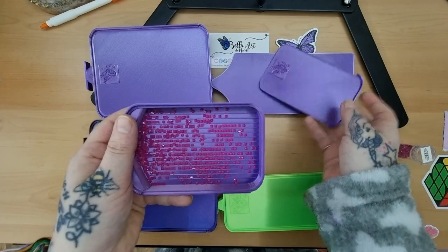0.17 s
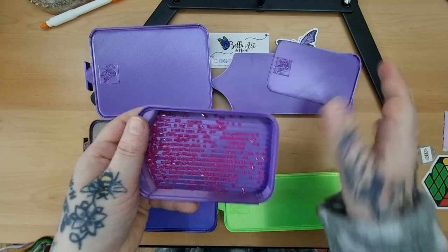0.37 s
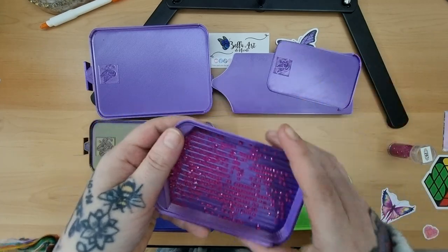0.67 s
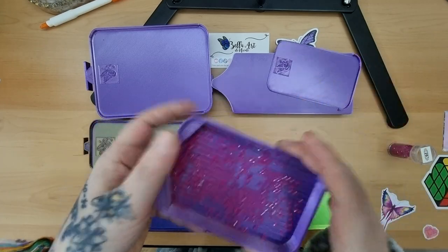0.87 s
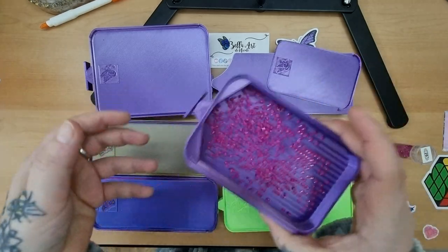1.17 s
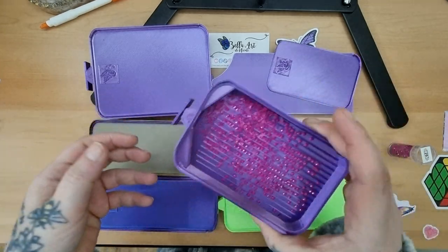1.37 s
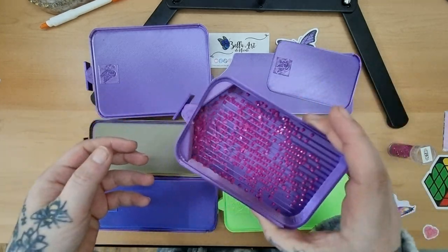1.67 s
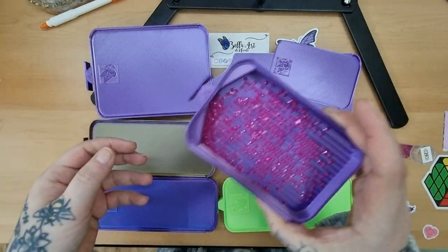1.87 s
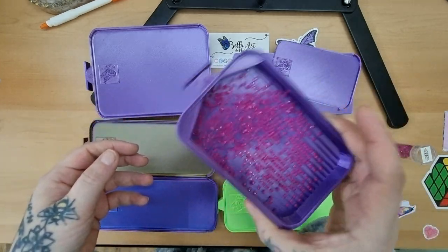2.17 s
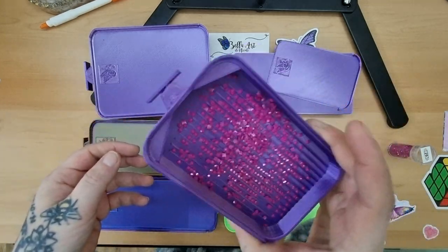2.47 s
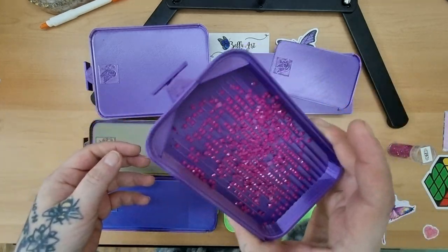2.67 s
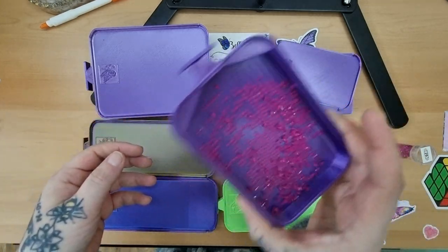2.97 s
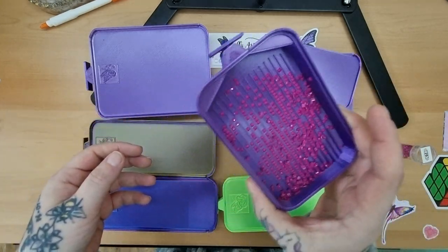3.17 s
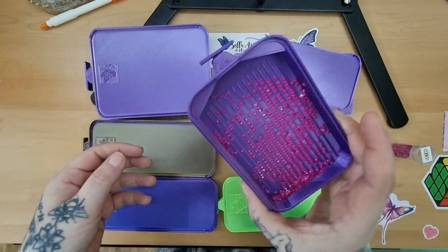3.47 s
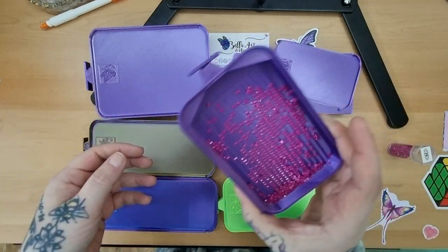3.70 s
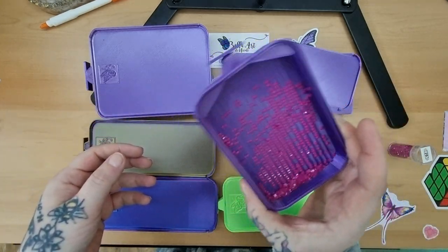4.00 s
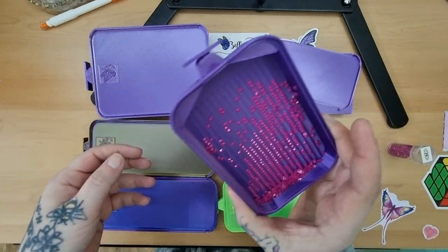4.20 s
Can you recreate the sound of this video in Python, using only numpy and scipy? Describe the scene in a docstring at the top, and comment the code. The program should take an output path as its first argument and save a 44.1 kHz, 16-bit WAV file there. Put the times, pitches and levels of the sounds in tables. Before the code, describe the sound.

Close up in a small quiet room, a plastic lid lands on a desk with several sharp clacks, followed by a hollow knock on a plastic tray. Lots of tiny gems then swish back and forth in the shaken tray, bright and rattly over a faint dull hum. Toward the end they settle into a softer, rapid trickling rattle that gradually weakens.

```python
"""A small quiet room, just above a wooden desk. A plastic lid clatters down and a hand knocks a ridged
plastic tray; each impact excites damped modes. The tray is shaken: hundreds of tiny resin gems slide in
surges with a dull hum, then in a fine, quick rattle, colliding and driving the resonant floor.
Sliding friction adds light scrapes and brief rubs, over faint room air."""
import sys
import numpy as np
from scipy import signal
from scipy.fft import rfft, irfft, next_fast_len
from scipy.io import wavfile
from scipy.ndimage import uniform_filter1d, map_coordinates

SR = 44100
rng = np.random.default_rng(int(sys.argv[2]) if len(sys.argv) > 2 else 0)


def unload_audio(sound):
    """Save the sound as a 16-bit wav file, at the path given as the first command line argument."""
    columns = np.transpose(np.atleast_2d(sound))
    # keep every value between -1 and 1, then stretch to whole-number steps
    steps = np.round(np.clip(columns, -1, 1) * 32767)
    wavfile.write(sys.argv[1], SR, steps.astype(np.int16))


N = 191495

# each swing of the tray sets the gems sliding: crest_s, level_db, rise_s
GEM_SURGES = [(1.036, -47.2, 0.032), (1.133, -36.0, 0.035), (1.203, -37.0, 0.026), (1.308, -36.7, 0.038),
              (1.47, -36.6, 0.041), (1.599, -35.9, 0.032), (1.679, -37.4, 0.024), (1.759, -39.9, 0.033),
              (1.983, -44.7, 0.024), (2.083, -40.9, 0.045), (2.179, -35.6, 0.035), (2.254, -41.9, 0.039),
              (2.344, -38.1, 0.016), (2.554, -42.0, 0.042), (2.693, -40.0, 0.05), (2.825, -43.6, 0.06),
              (2.982, -38.7, 0.028), (3.065, -44.2, 0.056), (3.144, -42.5, 0.047)]
# a fine shake rattles the gems; the last point is a quick fade-out at the end: time_s, relative_db
FINE_SHAKE = [(3.24, -52), (3.454, -47), (3.64, -52), (3.72, -48), (3.94, -52), (4.324, -55), (4.34, -65)]
# spectrum of the gems' ticks: frequency_hz, gain_db
TICK_SPECTRUM = [(80, -38), (220, -34), (340, -21), (680, -19), (900, -11.5), (1400, -13.5), (2080, -11),
                 (2600, -10.5), (3400, -6.5), (6500, -3), (7600, 0), (10200, -8), (12500, -6),
                 (14600, -10.5), (15700, -10)]
# their stereo width: frequency_hz, side_to_mid_db
TICK_WIDTH = [(300, 2), (900, -8.5), (1300, -2), (2000, -12.5), (2500, 3), (3400, -0.5), (4400, -1),
              (15000, 1)]
# the tilted tray throws its finest ticks to the right: frequency_hz, left_to_right_db
GEM_BALANCE = [(500, 2.5), (1000, 6), (2000, 2.5), (5000, -3), (8500, 1.4), (12500, 0), (16000, -12)]
# resonances of the tray floor: pitch_hz, width_hz, mid_db, side_db
FLOOR_RESONANCES = [(845, 53, -8, -26), (1621, 167, 4.5, 1), (1700, 92, 0.5, -14), (1844, 39, 2, -36),
                    (2170, 130, -17, 4), (2943, 214, -14.5, 2.5), (5520, 270, -11.5, -8),
                    (7450, 590, -18.5, -9)]
# the lid meets the desk: start_s, body_db, snap_db, thud_db, thud_hz, contact_s
LID_HITS = [(0.103, -36.5, -45.5, -49, 88.7, 0.0037), (0.11, -28, -47, -42.5, 91.7, 0.0042),
            (0.123, -23.5, -48, -37, 86.1, 0.011), (0.1595, -29.5, -26.5, -64, 87.5, 0.00017),
            (0.211, -36, -34.5, -69, 109, 0.00029), (0.236, -46.5, -47.5, -58, 82, 0.00089),
            (0.3425, -44.5, -40.5, -60, 227, 0.0005), (0.361, -34.5, -42, -62, 230, 0.0044),
            (0.388, -30.5, -40.5, -82, 110, 0.0063), (0.4062, -27.5, -28, -55.5, 99, 0.0013),
            (0.421, -43.5, -54, -45, 160.7, 0.00075)]
# the hand knocks the tray: start_s, body_db, snap_db, thud_db, thud_hz, contact_s
TRAY_HITS = [(0.673, -70, -63, -79, 110, 0.0011), (0.7235, -43, -40, -67, 89, 0.00095),
             (0.7285, -29, -37, -48, 85.2, 0.0049), (0.745, -36, -42, -48.5, 88, 0.0044),
             (0.85, -54.5, -50.5, -67, 88, 0.0039), (2.251, -35.5, -50, -58, 88.3, 0.004),
             (2.536, -42, -58, -56.5, 178.4, 0.0023), (2.948, -57, -67, -72, 91, 0.0079)]
# modes of the lid: pitch_hz, relative_db, t60_s, interaural_phase_rad
LID_MODES = [(263, -10.5, 0.14, 0.5), (345.4, -9, 0.21, 0.73), (484, 0.5, 0.086, 2.06),
             (794, 3.5, 0.04, 0.88), (839, -5, 0.085, 1.1), (1070, 10, 0.019, 1.8),
             (1222, 11.5, 0.027, 1.45), (1366, 4.5, 0.057, 0.73), (1610, 0, 0.087, 3.4),
             (1910, -2, 0.026, 1.1), (3000, -7, 0.061, 2), (3870, 3, 0.028, 1.3)]
# modes of the tray: pitch_hz, relative_db, t60_s, interaural_phase_rad
TRAY_MODES = [(279, -9.5, 0.095, 0.6), (331, -7, 0.38, 0.96), (550, -7, 0.07, 1.7), (746.7, -2, 0.23, 2),
              (827, 9.5, 0.076, 3), (1022, -5, 0.18, 5), (1342, 11.5, 0.072, 2.1), (1580, -7, 0.19, 9.3),
              (1890, 6.5, 0.022, 0.65), (2153, 2.5, 0.097, 3.15), (2905, 13, 0.02, 0.73),
              (3190, -2.5, 0.18, 0.85)]
# modes of the thud: pitch_ratio, relative_db, t60_s, interaural_phase_rad
THUD_MODES = [(1, 1, 0.17, 0.28), (2.07, -3, 0.19, 0.87)]
# dense clack of a plastic body: frequency_hz, gain_db
CLACK_SPECTRUM = [(60, -60), (160, -33), (280, 14), (400, -6.5), (620, -3.5), (820, -0.5), (1300, -8),
                  (2200, -4.5), (3300, -3), (4200, -23), (9000, -35), (16000, -62)]
# bright snap of contact: frequency_hz, gain_db
SNAP_SPECTRUM = [(500, -37), (2500, -29), (4200, 5), (6000, 1.5), (8000, -1.5), (10000, -8), (16000, -15)]
# plastic slides: start_s, length_s, level_db
SCRAPES = [(0, 0.49, -56.5), (.5, 0.029, -65), (.617, 0.036, -64), (.8, 0.046, -52.5)]
# its light scrape: frequency_hz, gain_db
SCRAPE_SPECTRUM = [(200, -3), (350, -4), (700, -0.5), (1200, -9.5), (1700, 1.5), (2200, -3.5), (3400, -7),
                   (4400, -14.5), (5200, -9), (6200, -18.5), (7800, -17), (9500, -40), (16000, -24)]
# the lid drags on the desk: start_s, length_s, level_db
DRAGS = [(.215, 0.045, -45), (.34, 0.067, -42)]
# its hollow judder: frequency_hz, gain_db
DRAG_SPECTRUM = [(120, -52), (250, 6), (350, -20), (450, 6.5), (540, 1), (660, 2), (850, -33), (1300, -7),
                 (3000, -22), (9000, -61)]
# dull low sounds of the tray: brief finger rubs, and a steady hum from the shaken gems (the long row):
# start_s, length_s, level_db
TRAY_LOWS = [(0, 0.022, -60), (.5, 0.22, -72.5), (1.0, 1.9, -76), (2.945, 0.055, -65.5), (3.85, 0.45, -70)]
# spectrum of these low sounds: frequency_hz, gain_db
TRAY_LOW_SPECTRUM = [(60, -9.5), (180, -23), (270, -0.5), (345, 8.5), (450, -1.5), (650, -5), (1200, -61),
                     (4000, -71)]
# stereo width of desk sounds and air: frequency_hz, side_to_mid_db
NOISE_WIDTH = [(80, -5), (200, -23), (330, -2), (600, 1.5), (1050, 0), (1550, 6), (2300, 2), (5000, 1)]
# reverberation time of the room: frequency_hz, t60_s
ROOM_DECAY = [(80, 0.25), (250, 0.44), (1500, 0.15), (5000, 0.18), (14000, 0.15)]
# room air: frequency_hz, gain_db
AIR_SPECTRUM = [(20, -23), (80, -1.5), (160, -16.5), (350, -9), (1000, 0), (4000, -1.5), (10000, -11.5),
                (16000, -31)]

IMPACTS_PER_S, BRISK_DB = 15000, -43  # collision rate and level of a brisk swing
COAST_T60_S = 0.67  # the gems coast to rest after each crest
ROCK_HZ, ROCK_DB = 8.9, 0.27  # the wrist rocks the tray
FIRST_FLICK_S, FLICK_HZ, FLICK_DB = 3.319, 27.16, 0.5  # level relative to the steady trickle
BUNCH_S = 0.0077  # half the time a bunch of gems takes to land
UNEVEN_DB, UNEVEN_S = 1.4, 0.0018  # flicks scatter in strength and timing
ATTACK_S, RELEASE_T60_S = 0.004, 0.26  # of scrapes, drags, rubs and hum
TOP_HZ = 15760


def gems():
    """Collision noise: harder shaking brings more and louder impacts, gem on gem and gem on floor."""
    strength = np.hypot(surging(), fine_shaking())
    rate = np.clip(IMPACTS_PER_S * (strength / amp(BRISK_DB)) ** .6, 200, SR)
    impacts = collisions(rate, spread_db=5) * amp(0.42 * wobble(140))  # neighbours set each other off
    ticks = filtered(wandering(impacts, depth_db=4.0), lambda hz: amp(along(TICK_SPECTRUM, hz)))
    ticks = stereo(ticks, TICK_WIDTH)
    # only the gems that land drive the floor, so its ring chatters
    mid, side = filtered(impacts * amp(1.5 * wobble(50)), tray_floor)
    drum = unit(np.array([mid + side, mid - side]))
    rattle = strength * (amp(-0.25) * ticks + amp(-13.0) * drum)
    return filtered(rattle, lambda hz: amp(np.outer([.5, -.5], along(GEM_BALANCE, hz))))


def surging():
    """Incoherent sources add in power: the envelope of surges that swell to a crest, then coast."""
    t = np.arange(N) / SR
    power = np.zeros(N)
    for crest, db, rise in GEM_SURGES:
        swell = np.exp(-(np.minimum(t - crest, 0) / rise) ** 2)
        power += swell * amp(db - 60 * np.maximum(t - crest, 0) / COAST_T60_S) ** 2
    return np.sqrt(power)


def fine_shaking():
    """Amplitude modulation: the envelope of a rocking trickle, with a bunch of gems on every flick."""
    t = np.arange(N) / SR
    flicks = np.arange(FIRST_FLICK_S, N / SR, 1 / FLICK_HZ)
    bunches = np.zeros(N)
    for s, (size, late) in zip(flicks, rng.standard_normal((100, 2))):
        landing = np.exp(-((t - s - UNEVEN_S * late) / BUNCH_S) ** 2)
        bunches += amp(FLICK_DB + UNEVEN_DB * size) ** 2 * landing
    trickle_db = np.interp(t, *np.transpose(FINE_SHAKE), left=-np.inf) + 1.5
    rock_db = ROCK_DB * np.cos(2 * np.pi * ROCK_HZ * (t - FIRST_FLICK_S))
    return amp(trickle_db + rock_db) * np.sqrt(1 + bunches)


def collisions(rate, spread_db):
    """Shot noise: independent impulses, rate a second, of random size and place (mid, side)."""
    happens = rng.random(N) < rate / SR
    size = amp(spread_db * np.clip(rng.standard_normal(N), -2, 2))
    place = 2 * np.pi * rng.random(N)
    return unit(happens * size / np.sqrt(rate) * np.array([np.cos(place), np.sin(place)]))


def wandering(x, depth_db):
    """Modal excitation depends on position: as the gems cross the floor, peaks and hollows drift."""
    hz, _, spectrum = signal.stft(x, SR, nperseg=1024)
    field = uniform_filter1d(rng.standard_normal(spectrum.shape), size=6, axis=1)
    field = unit(uniform_filter1d(field, size=14, axis=2))
    # dense high modes even out
    reach = along([(600, 0.45), (2400, 0.84), (6000, 0.42), (12000, 0.18)], hz)[:, None]
    return signal.istft(spectrum * amp(depth_db * reach * field), SR, nperseg=1024)[1][:, :N]


def tray_floor(hz):
    """Resonance: the thin, ridged floor responds (mid, side) in peaks with steep skirts."""
    return sum(amp([[mid], [side]]) / (1 + ((hz - pitch) / width) ** 2) ** 2
               for pitch, width, mid, side in FLOOR_RESONANCES)


def knocks(hits, modes, body_t60, snap_t60, ring_db):
    """Impact excitation: each blow leaves a decaying clack, ringing modes, a snap and a dull thud."""
    out, t = np.zeros((2, N)), np.arange(SR // 2) / SR
    for start, body_db, snap_db, thud_db, thud_hz, contact in hits:
        clack = noise(CLACK_SPECTRUM, len(t)) * amp(-60 * t / body_t60)
        body = clack + amp(ring_db) * ring(modes, t)
        scuff_t60 = snap_t60 + 12 * contact  # soft contacts scuff for longer
        snap = noise(SNAP_SPECTRUM, len(t)) * amp(-60 * t / scuff_t60)
        thud = ring(np.multiply(THUD_MODES, [thud_hz, 1, 1, 1]), t)
        rise = 1 - np.exp(-t / contact)
        add(out, start, rise * (amp(body_db) * body + amp(snap_db) * snap + amp(thud_db) * thud))
    return out


def ring(modes, t):
    """Free vibration: a sum of damped sinusoids of random strength, offset in phase between the ears."""
    hz, db, t60, apart = np.transpose(modes)[:, :, None]
    size, phase = rng.standard_normal((2, len(modes), 1))
    gain = amp(db + 2.7 * size)
    waves = [np.sin(2 * np.pi * hz * t + np.pi * phase + ear * apart) for ear in (.5, -.5)]
    return np.sum(gain * amp(-60 * t / t60) * waves, axis=1) / np.sqrt(np.sum(gain ** 2) / 2)


def contact_noise(spans, spectrum, rough_db, rough_hz):
    """Random excitation, by friction or shaken gems: rough noise that sets in, lasts, then dies away."""
    t = np.arange(N) / SR
    envelope = np.zeros(N)
    for start, length, db in spans:
        attack = np.clip((t - start) / ATTACK_S, 0, 1)
        envelope += attack * amp(db - 60 * np.maximum(t - start - length, 0) / RELEASE_T60_S)
    return envelope * amp(rough_db * wobble(rough_hz)) * noise(spectrum, N)


def room(x, wet_db):
    """Diffuse reverberation: a short tail that keeps changing as the hands and tray move."""
    out = x.copy()
    for piece in np.array_split(np.arange(N), 14):
        hz, t, spectrum = signal.stft(rng.standard_normal((2, SR // 3)), SR, nperseg=256)
        decay = amp(-60 * t / along(ROOM_DECAY, hz)[:, None])
        tail = signal.istft(spectrum * decay, SR, nperseg=256)[1]
        tail = stereo(tail, [(100, -7), (500, 2.0)])  # long waves reach both ears alike
        echo = signal.fftconvolve(x[:, piece], tail / np.linalg.norm(tail[0]), axes=1)
        add(out, piece[0] / SR + .004, amp(wet_db) * echo)
    return out


def room_air():
    """Ambient noise: a faint, steady broadband floor."""
    return amp(-65.5) * noise(AIR_SPECTRUM, N)


def amp(db):
    """Decibels to amplitude ratio."""
    return 10 ** (np.asarray(db) / 20)


def unit(x):
    """Normalisation to rms 1."""
    return x / np.sqrt(np.mean(x ** 2) + 1e-20)


def along(points, hz):
    """Interpolation of (frequency_hz, value) points on a log axis."""
    frequencies, values = np.transpose(points)
    return np.interp(np.log(hz + 1), np.log(frequencies + 1), values)


def wobble(rate):
    """Smooth random modulation, rate knots a second."""
    return map_coordinates(rng.standard_normal(1000), [np.arange(N) * rate / SR], mode="wrap")


def filtered(x, response):
    """Linear filtering: the spectrum of x times a frequency response."""
    n = x.shape[-1]
    padded = next_fast_len(n + 8192)
    return irfft(rfft(x, padded) * response(np.fft.rfftfreq(padded, 1 / SR)), padded)[..., :n]


def stereo(pair, width):
    """Sum and difference: left and right from a mid and a side signal."""
    mid, side = filtered(pair, lambda hz: amp([0 * hz, along(width, hz)]))
    return unit(np.array([mid + side, mid - side]))


def noise(spectrum, size):
    """Spectral shaping: coloured stereo noise of rms 1."""
    white = rng.standard_normal((2, size))
    return stereo(filtered(white, lambda hz: amp(along(spectrum, hz))), NOISE_WIDTH)


def add(track, start_s, sound):
    """Superposition of a sound on the track."""
    part = track[:, round(start_s * SR):][:, :sound.shape[-1]]
    part += sound[:, :part.shape[-1]]


def scene():
    """Superposition: lid, tray and gems with their reverberation, then contact noise and air."""
    lid = knocks(LID_HITS, LID_MODES, body_t60=0.062, snap_t60=0.031, ring_db=2.5)
    lid *= amp([[-.8], [.8]])  # slightly to the right
    tray = knocks(TRAY_HITS, TRAY_MODES, body_t60=0.14, snap_t60=0.049, ring_db=5.0)
    impacts = room(lid, wet_db=-9.0) + room(tray, wet_db=-6.5) + room(gems(), wet_db=-7.5)
    scrape = contact_noise(SCRAPES, SCRAPE_SPECTRUM, rough_db=1.6, rough_hz=62.9)
    drag = contact_noise(DRAGS, DRAG_SPECTRUM, rough_db=2.5, rough_hz=109.0)
    rubs_and_hum = contact_noise(TRAY_LOWS, TRAY_LOW_SPECTRUM, rough_db=3, rough_hz=45)
    return impacts + scrape + drag + rubs_and_hum + room_air()


def record(dry):
    """Band limiting: an ideal low-pass filter at TOP_HZ."""
    return filtered(dry, lambda hz: hz < TOP_HZ)


dry = scene()
out = record(dry)
unload_audio(out)
```